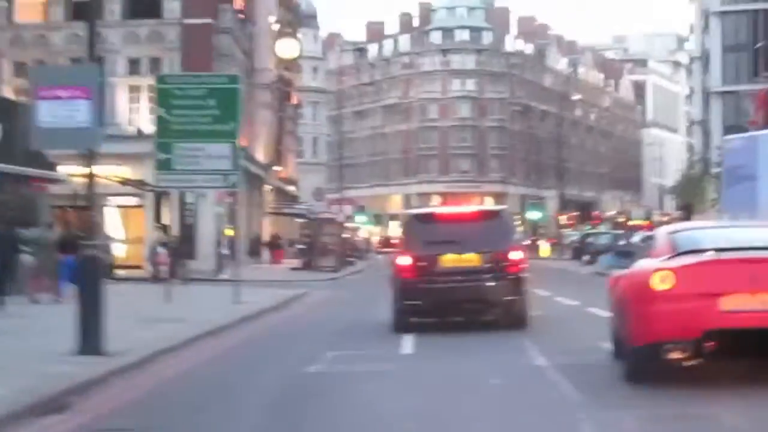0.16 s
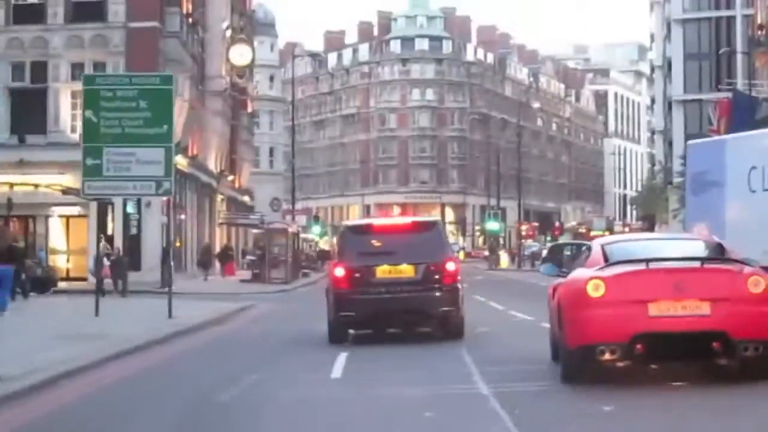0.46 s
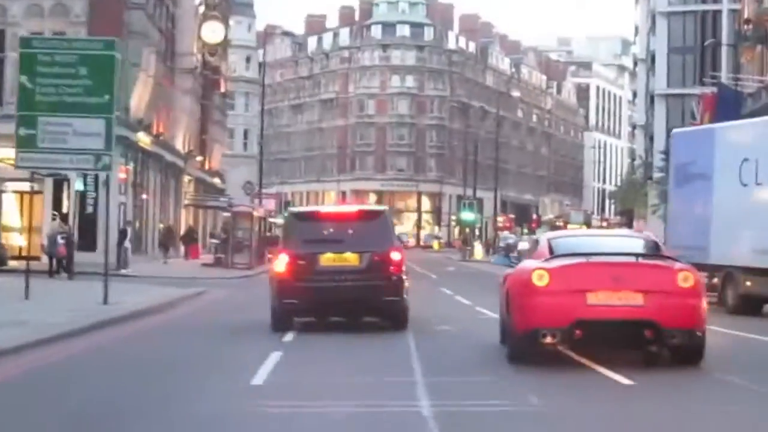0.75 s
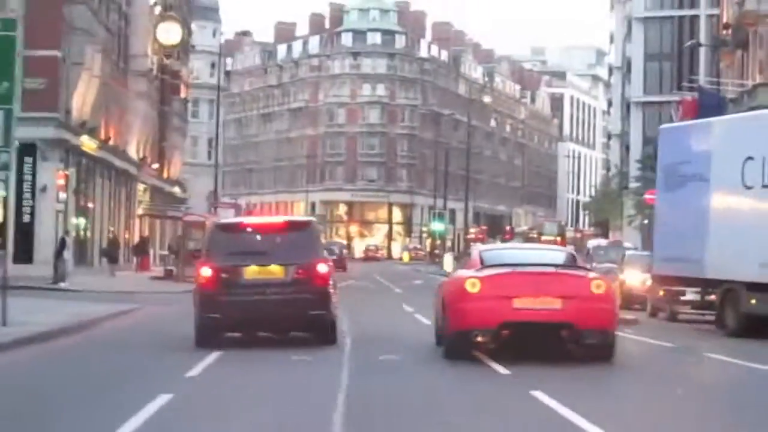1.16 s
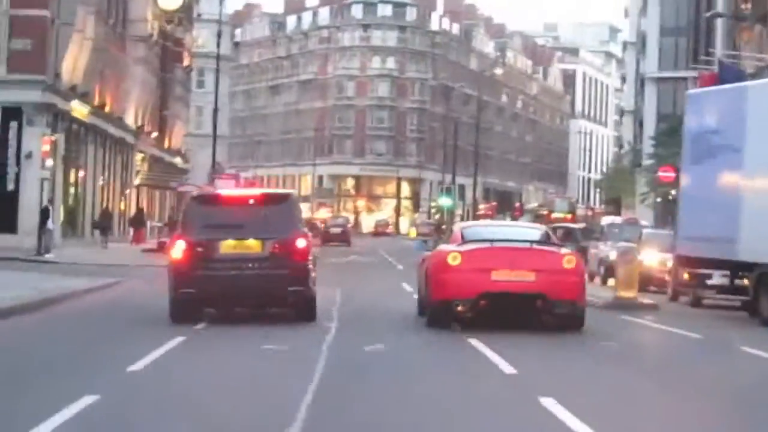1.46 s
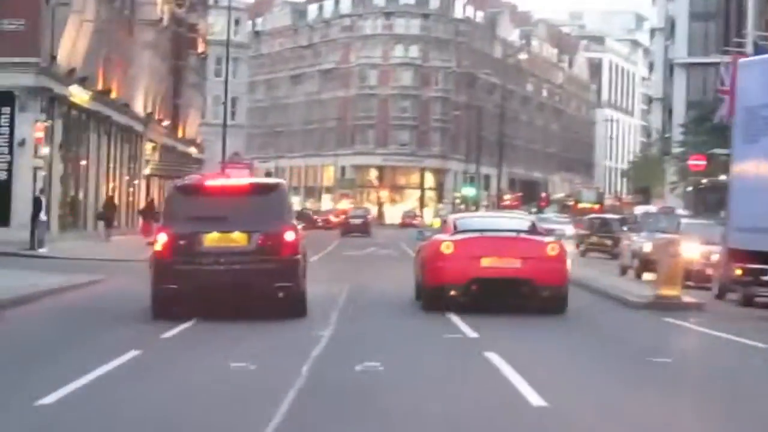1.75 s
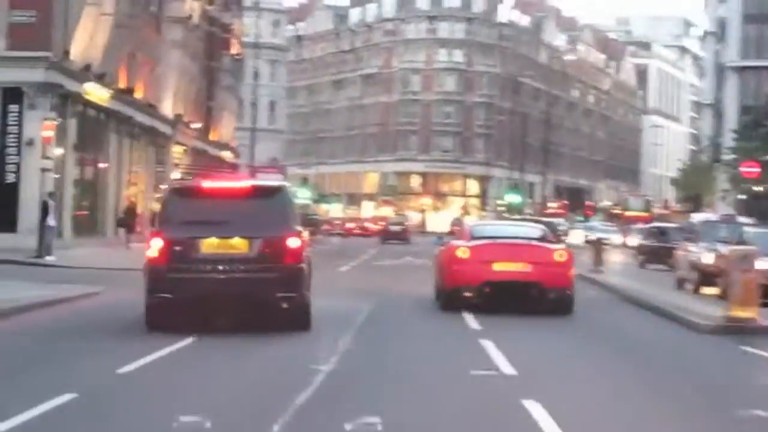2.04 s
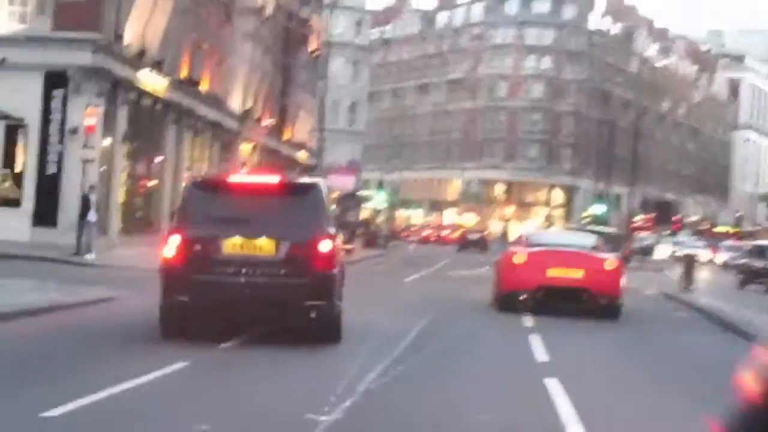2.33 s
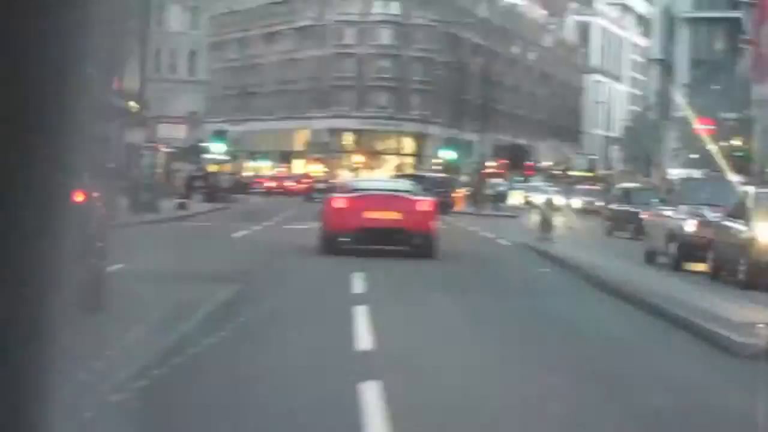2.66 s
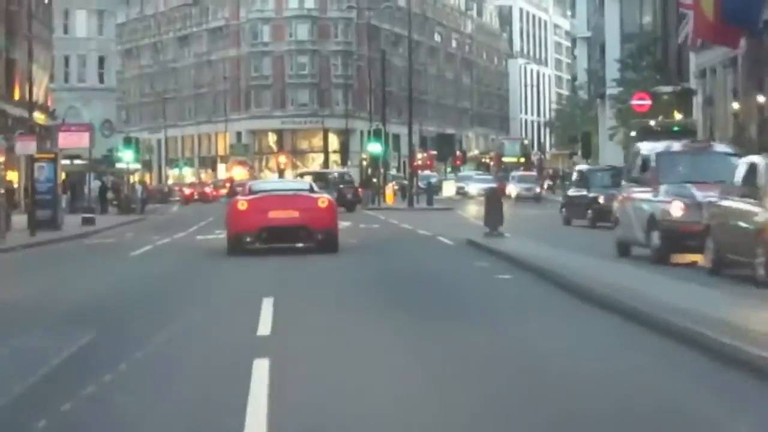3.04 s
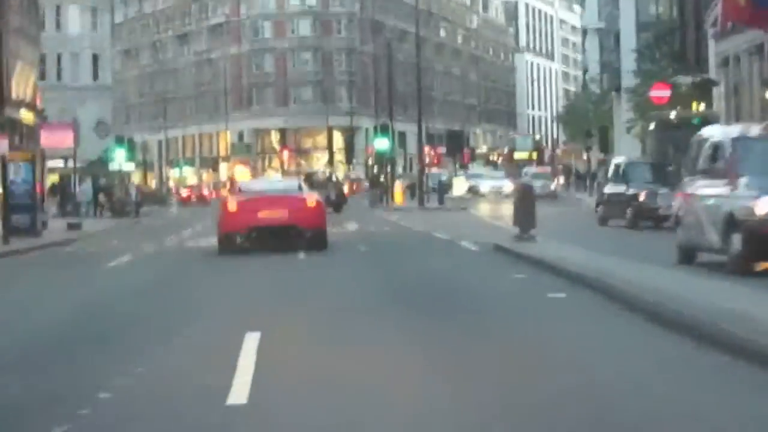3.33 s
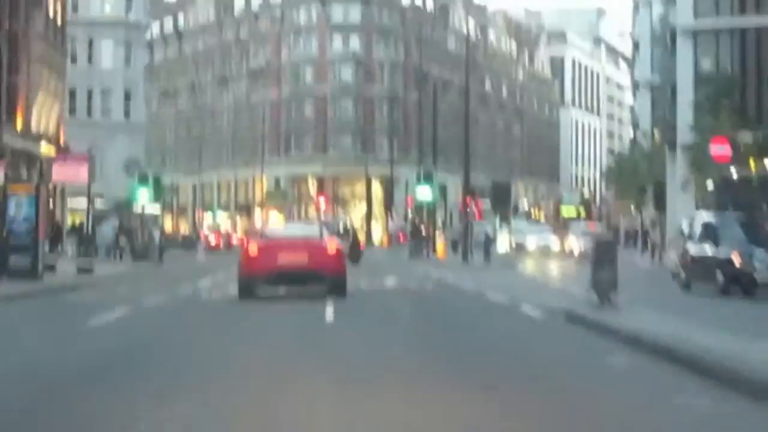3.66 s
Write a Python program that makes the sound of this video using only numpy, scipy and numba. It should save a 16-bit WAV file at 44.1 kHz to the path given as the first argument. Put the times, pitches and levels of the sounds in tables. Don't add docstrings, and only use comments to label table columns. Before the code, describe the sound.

A sports car starts with a low boom under heavy wind thumps, climbs to a raspy howl on a city street, then fades ahead as the handheld microphone is pulled into a following car.

```python
import sys
import numpy as np
from scipy import signal
from scipy.fft import rfft, irfft
from scipy.io import wavfile
from scipy.ndimage import uniform_filter1d
from numba import njit

SR = 44100
rng = np.random.default_rng(int(sys.argv[2]) if len(sys.argv) > 2 else 0)


def dump(signal):
    limited = np.clip(np.atleast_2d(signal).T, -1, 1)
    pcm = np.round(limited * 32767).astype(np.int16)
    wavfile.write(sys.argv[1], SR, pcm)


def attenuation_scalar(level_db):
    decades = np.asarray(level_db, float) / 20
    return 10 ** decades


N = 167580
TIME = np.arange(N) / SR
INSIDE_S = 2.58

# (frequency [Hz], level [dB])
TOWN_COLOUR = [(60, -17.5), (130, -0.5), (210, 0.5), (450, 0), (900, -3), (1500, -12), (3000, -18.5),
               (9000, -19)]
# (time [s], pitch [Hz], level [dB])
CABIN_DRONE = [
    (2.95, 512, -72),
    (3.15, 508, -43),
    (3.5, 490, -44),
    (3.7, 500, -51),
    (3.8, 495, -42),
]
# (time [s], level [dB], eddy pitch [Hz])
WIND_COURSE = [(0, -12, 220), (.1, 3.5, 230), (.13, -10, 227), (.17, 0.5, 220), (.22, -22.5, 300),
               (.35, -30, 350), (.6, -19, 324), (1, -10, 286), (1.25, -14, 269.8), (1.4, -10, 288),
               (1.55, -17.5, 484), (1.75, -11, 543.2), (1.82, -20, 482), (2.05, -16.5, 553),
               (2.28, -22.5, 550), (2.37, -11, 736), (2.535, -19.5, 700), (2.565, -70, 496)]
# (time [s], peak level [dB], left minus right [dB])
PORT_SLAPS = [(0.026, -30, 6), (0.097, -29.5, 11), (1.494, -20, 10), (1.497, -20, 12), (1.507, -30.5, 14),
              (1.602, -15.5, 11), (1.734, -15, 23), (1.740, -13, 15), (1.762, -15.5, 16),
              (1.832, -26.5, -6), (1.856, -23.5, -13), (2.06, -18, -6.5), (2.191, -8.5, 16),
              (2.213, -16.5, -14), (2.356, -20.5, 10), (2.365, -11.5, 15), (2.378, -11, -7),
              (2.386, -14.5, 14), (2.389, -20, -12), (2.401, -10.5, 9), (2.408, -10, 13),
              (2.421, -10.5, 10), (2.435, -17, 13), (2.442, -18, 9), (2.455, -15, -12.5), (2.461, -18, -19),
              (2.465, -15.5, -12), (2.474, -20.5, -8), (2.503, -6, 20), (2.512, -12, 6), (2.517, -18, -8),
              (2.57, -25, -3)]
# (time [s], exhaust beat [Hz], level [dB], throttle rasp [dB], boom of the low orders [dB])
ENGINE_COURSE = [(0, 90.46, -22, -37.5, 17), (.08, 90.7, -27, -42, 27.5), (.12, 93.65, -29, -35, 28.5),
                 (.2, 94.63, -32, -32, 5.5), (.44, 103.5, -24, -49, -3), (.64, 109.6, -19.5, -44.5, 5),
                 (.78, 114.5, -19.5, -21, 0), (.95, 118.9, -18.5, -30, -5.5), (1.22, 126.7, -24, -24.5, 4),
                 (1.42, 133.4, -21.5, -23, 3), (1.7, 140.1, -22, -35.5, -2.5),
                 (1.97, 147.4, -14.5, -10.5, -2), (2.2, 151.1, -15.5, -13.5, -2),
                 (2.55, 149.8, -24.5, -18.5, -4), (2.75, 146.4, -30.5, -50, 3), (3.1, 137.3, -44, -24, 4),
                 (3.42, 133.5, -46.5, -19, 0.5), (3.8, 123.9, -55.5, -21, 12.5)]
# (multiple of the beat [1], level [dB])
EXHAUST_ORDERS = [(1, -8.5), (2, -1), (3, -1.5), (4, -4.5), (5, -3.5), (6, -17), (7, -5.5), (8, -9),
                  (9, -7.5), (10, -11), (11, -14.5), (12, -6.5), (13, -24), (14, -16.5)]
# (time [s], length [s], level [dB])
ORDER_SWELLS = [
    [(2.7, .15, -12), (3.75, 0.18, 17)],
    [(.12, 0.1, 6), (.4, 0.15, -11), (2.5, 0.12, -7), (3.65, 0.098, -6.5)],
    [(.04, 0.094, -16), (.6, .1, -10), (1.05, 0.089, 8.5), (1.35, 0.055, 3), (2.05, 0.034, -9),
     (2.35, 0.046, 0), (3.7, 0.47, 4.5)],
    [(.27, 0.26, -14), (1.33, 0.17, 2), (1.6, .1, -3), (1.95, 0.084, 6.5), (2.35, 0.049, 9.5),
     (3.2, 0.31, -20)],
    [(.04, 0.076, -13), (.32, .08, 2), (.85, 0.046, -5), (1.3, 0.067, 0.5), (2.5, 0.12, -7.5),
     (2.75, 0.043, -6), (3.6, 0.091, -6)],
    [(.1, 0.23, 18.5), (.4, 0.084, 8), (1.08, 0.064, 2.5), (2.65, .05, 13.5), (3.6, 0.19, 6)],
    [(.33, .11, -11), (1.7, 0.062, 9), (2.2, 0.12, 4.5), (2.55, 0.031, 7.5), (3.35, 0.06, 10)],
    [(.05, 0.13, 9.5), (.3, 0.11, 4), (1.05, .07, 11.5), (1.5, 0.23, -8), (1.95, .13, -6), (2.5, 0.099, -7)],
    [(1, 0.19, -7), (1.95, 0.049, -0.5), (2.2, 0.085, -3), (3.2, 0.25, -4)],
    [(0.844, 0.031, 10)],
    [(.85, .05, 9), (1.5, 0.13, -5)],
    [(1.55, 0.44, -15), (2.25, 0.053, 0)],
    [],
    [],
]
# (frequency [Hz], width [Hz], level [dB])
PIPE_MODES = [(142, 34, -18), (217.4, 53, 0), (350, 45, 6.5), (507.8, 37.6, 2.5), (649, 68, -2),
              (810, 129, 5.5), (1036.6, 77, 0), (1315, 39, -5.5), (1740, 484, -3), (2400, 1000, -40.5)]
# (time [s], length [s], level [dB])
RASP_BARKS = [(.05, 0.055, -12), (.28, 0.068, 1), (.55, .1, -3), (.785, 0.084, 8.5), (.87, 0.02, 6.5),
              (1.03, .04, 8), (1.15, .05, -2), (1.34, 0.046, 6), (1.6, 0.09, -5), (2.08, 0.045, -1),
              (2.2, .03, 2.5), (2.32, 0.03, -1.5), (3.4, .1, -5)]
# (time [s], length [s], level [dB])
EXHAUST_SURGES = [(.165, 0.012, 5), (.79, 0.057, 2), (1.9, 0.039, -0.5), (2.56, 0.03, 2), (2.85, 0.089, -2),
                  (3.1, 0.058, -2)]
# (delay [s], left level [dB], right level [dB])
STREET_ECHOES = [(.0043, -18, -15), (.013, -15, -19), (.029, -19, -16)]
# (time [s], bass let through [dB])
WIND_FILTER = [(0, 4), (.205, -12), (.22, -25), (.45, -17), (.9, -6.5), (1.4, 0.5), (1.52, -4.5),
               (1.535, -32), (1.72, -36), (1.74, -22), (1.77, -27), (2.3, -27.5), (2.38, -23), (2.56, -24),
               (2.6, -17.5), (3, -10), (3.4, -2.5), (3.8, -1.5)]
# (frequency [Hz], level [dB])
HOUSING = [(100, -1), (1200, 0.5), (3200, -7), (4000, -18.5), (5100, -14.5), (7000, -20), (10000, -31),
           (15000, -56.5)]


def curve(table, col):
    rows = np.array(table, float)
    return np.interp(TIME, rows[:, 0], rows[:, col])


def bumps(rows):
    total = np.zeros(N)
    for s, length, db in rows:
        total += db * np.exp(-((TIME - s) / length) ** 2)
    return total


def unit(x):
    return x / np.sqrt(np.mean(x ** 2))


def walk(rate):
    hold = max(int(SR / rate), 2)
    levels = rng.standard_normal(N // 100)[:N // hold + 1]
    steps = np.repeat(levels, hold)[:N]
    return unit(uniform_filter1d(uniform_filter1d(steps, hold), hold))


def colour(x, table):
    rows = np.array(table, float)
    log_hz = np.log(np.arange(N + 1) * SR / N / 2 + 1)
    gain = attenuation_scalar(np.interp(log_hz, np.log(rows[:, 0]), rows[:, 1]))
    return irfft(rfft(x, 2 * N) * gain, 2 * N)[..., :N]


@njit
def svf(x, hz, k):
    y, b, l = np.empty((3, len(x))), 0., 0.
    for i in range(len(x)):
        g = np.tan(np.pi * hz[i] / SR)
        v = (b + g * (x[i] - l)) / (1 + g * (g + k))
        low = l + g * v
        y[0, i], y[1, i], y[2, i] = low, k * v, x[i] - k * v - low
        b, l = 2 * v - b, 2 * low - l
    return y


def steady(hz):
    return np.full(N, float(hz))


def band(x, hz, width_hz):
    return svf(x, steady(hz), float(width_hz) / hz)[1]


def town():
    mid, side = (unit(colour(rng.standard_normal(N), TOWN_COLOUR)) * attenuation_scalar(1.2 * walk(8.8)) for _ in range(2))
    return attenuation_scalar(-39.5) * np.array([mid + 0.38 * side, mid - 0.13 * side])


def drone():
    phase = 2 * np.pi * np.cumsum(curve(CABIN_DRONE, 1)) / SR + walk(15)
    return np.sin(phase) * attenuation_scalar(curve(CABIN_DRONE, 2) + 2.2 * walk(12))


def eddies(hz, gust_db):
    flutter_db = 3
    low = svf(rng.standard_normal(N) * attenuation_scalar(flutter_db * walk(70)), hz, 1.54)[0]
    low = svf(low, 1.86 * hz, 0.65)[0]
    low = svf(low, steady(130), 1.64)[2]
    top = svf(rng.standard_normal(N) * attenuation_scalar(flutter_db * walk(90) + gust_db), 4 * hz, 0.64)[0]
    return (unit(low) + attenuation_scalar(-16) * unit(top)) * attenuation_scalar(curve(WIND_COURSE, 1) + gust_db)


def wind():
    hz, gust_db = curve(WIND_COURSE, 2), 1.3 * walk(13.76)
    side = eddies(hz, gust_db)
    mid = attenuation_scalar(-13.5) * eddies(hz, gust_db)
    return np.array([attenuation_scalar(1.5) * (mid + side), mid - side])


def slaps():
    hold_s, t60_s, thud_hz, crackle_hz, crackle_db = .002, 0.021, 900, 1500, 1
    env = np.zeros((2, N))
    for s, db, pan_db in PORT_SLAPS:
        decay = attenuation_scalar(-60 * np.maximum(TIME - s - hold_s, 0) / t60_s)
        port_loss_db = np.maximum(np.array([[-pan_db], [pan_db]]), 0)
        env += attenuation_scalar(db - port_loss_db) * (TIME >= s) * decay
    ports = []
    for burst in env * rng.standard_normal((2, N)):
        thud = 4 * band(burst, thud_hz, 1.77 * thud_hz)
        crackle = svf(burst, steady(crackle_hz), 1.4)[2]
        ports.append(thud + attenuation_scalar(crackle_db) * crackle)
    return np.array(ports)


def exhaust_tone(hz, turns):
    boom_hz, boom_wide_hz, valley_db, shut_db = 350, 180, -20, -6
    boom_db = curve(ENGINE_COURSE, 4)
    shut = np.clip((TIME - INSIDE_S) * 10, 0, 1)
    coarse_hz = np.arange(0, 2400, 10.)
    response = attenuation_scalar(valley_db) + sum(attenuation_scalar(db) / (1 + (2 * (coarse_hz - c) / w) ** 2) for c, w, db in PIPE_MODES)
    tone = np.zeros(N)
    for (k, db), swells in zip(EXHAUST_ORDERS, ORDER_SWELLS):
        level_db = db + bumps(swells) + 1.5 * min(k / 4, 1) * walk(19)
        level_db += shut_db * (k > 4) * shut
        level_db += boom_db / (1 + ((k * hz - boom_hz) / boom_wide_hz) ** 4)
        phase = 2 * np.pi * (k * turns + rng.random()) + .35 * walk(24.78)
        tone += attenuation_scalar(level_db) * np.interp(k * hz, coarse_hz, response) * np.sin(phase)
    return tone


def pipe_roar(turns):
    fired = np.diff(np.floor(3 * turns + .12 * walk(200)), prepend=0) > 0
    pulses = fired * rng.standard_normal(N) + 0.15 * rng.standard_normal(N)
    ringing = sum(attenuation_scalar(db) * band(pulses, f, 2 * w) for f, w, db in PIPE_MODES[2:])
    return attenuation_scalar(-4) * unit(ringing)


def gas_rasp(turns):
    puff_lead, puff_turns, floor, scatter_db = .22, .07, .22, 4
    flow, hiss = attenuation_scalar(2 * walk(18)), rng.standard_normal(N)
    beat = turns + puff_lead
    puff_level = attenuation_scalar(scatter_db * hiss[beat.astype(int)])
    puffs = puff_level * np.exp(-(beat % 1) / puff_turns)
    gas = (floor + puffs) * flow * hiss
    return unit(band(gas, 4500, 7200)) * attenuation_scalar(curve(ENGINE_COURSE, 3) + 8 + bumps(RASP_BARKS))


def engine():
    hz = uniform_filter1d(curve(ENGINE_COURSE, 1), 2000)
    turns = np.cumsum(hz) / SR
    exhaust = exhaust_tone(hz, turns) + pipe_roar(turns) + gas_rasp(turns)
    return exhaust * attenuation_scalar(curve(ENGINE_COURSE, 2) + bumps(EXHAUST_SURGES) + 1.2 * walk(16))


def cabin(x):
    rise_s = 0.54
    inside = np.clip((TIME - INSIDE_S) / rise_s, 0, 1)
    boom = attenuation_scalar(20) * band(x, 127, 39.3) + attenuation_scalar(-3.5) * band(x, 401, 68)
    return x + boom * inside


def street(x):
    x = cabin(x)
    t, left_db = np.arange(SR) / SR, 2.3
    out = np.array([x * attenuation_scalar(left_db / 2), x * attenuation_scalar(-left_db / 2)])
    dull = svf(x, steady(3000), 0.84)[0]
    bright = svf(x, steady(2200), 2.3)[2]
    for c in range(2):
        for part, t60_s, db in ((dull, .7, -14), (bright, .08, -3.5)):
            tail = rng.standard_normal(SR) * attenuation_scalar(-60 * t / t60_s) * np.minimum(t / 0.011, 1)
            out[c] += signal.fftconvolve(part, tail / np.linalg.norm(tail))[:N] * attenuation_scalar(db)
        for echo in STREET_ECHOES:
            lag = int(echo[0] * SR)
            out[c, lag:] += attenuation_scalar(echo[1 + c]) * x[:N - lag]
    return out


def scene():
    return street(engine()) + wind() + slaps() + town() + drone()


def band_limit(x):
    return signal.sosfilt(signal.butter(12, 15800, fs=SR, output="sos"), x)


def record(dry):
    hz = steady(324)
    cut = np.array([svf(svf(port, hz, 2.126)[2], hz, 0.95)[2] for port in dry])
    bass_gain = attenuation_scalar(np.minimum(curve(WIND_FILTER, 1), 0))
    heard = colour(cut + bass_gain * (dry - cut), HOUSING)
    rounded = heard / (1 + heard ** 4) ** (1 / 4)
    return band_limit(rounded)


dry = scene()
out = record(dry)
dump(out)
```